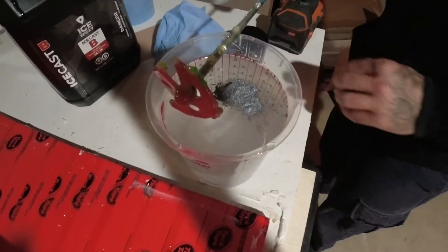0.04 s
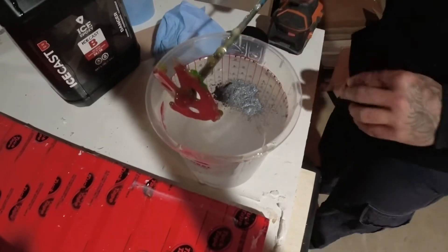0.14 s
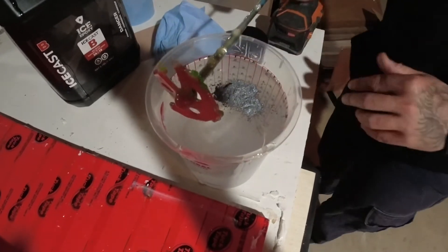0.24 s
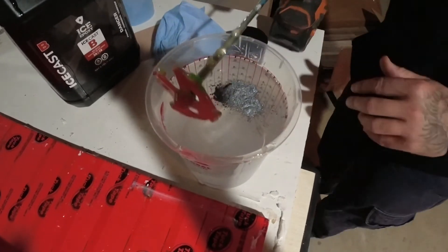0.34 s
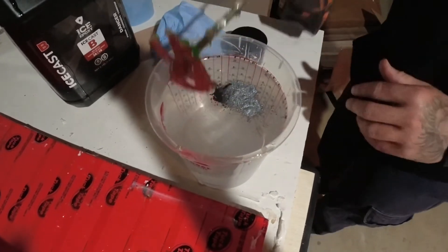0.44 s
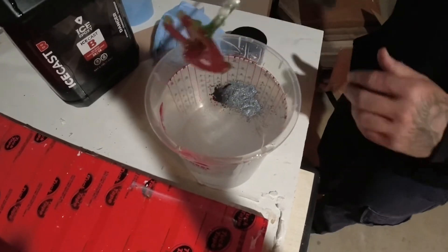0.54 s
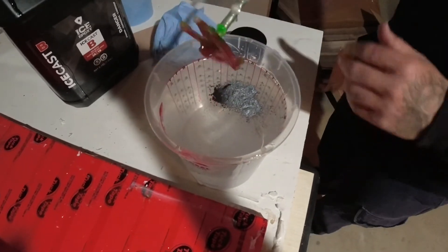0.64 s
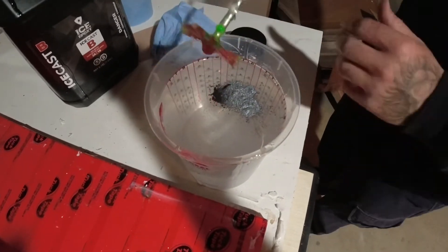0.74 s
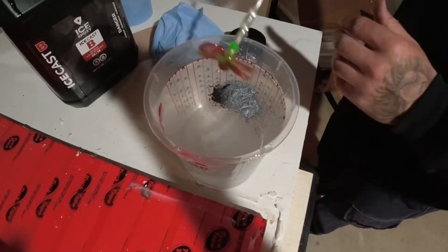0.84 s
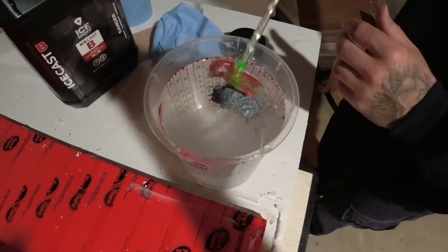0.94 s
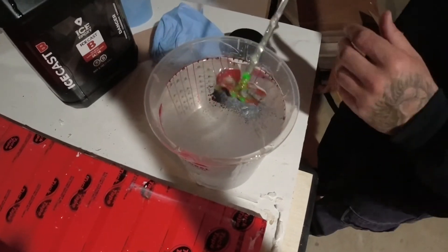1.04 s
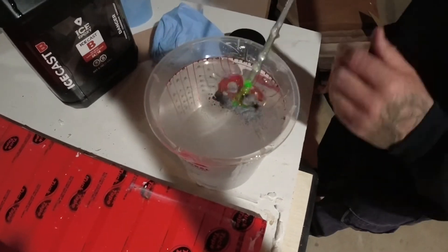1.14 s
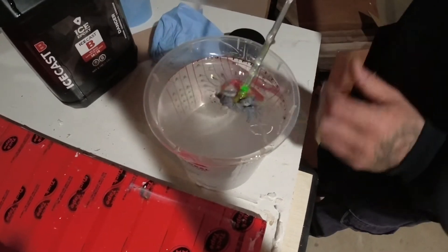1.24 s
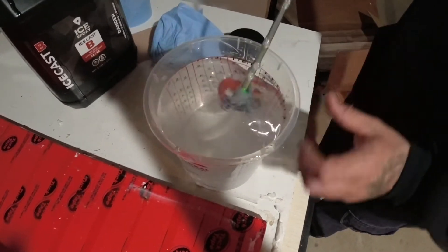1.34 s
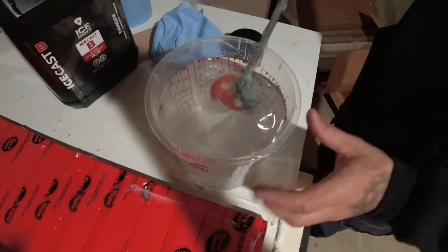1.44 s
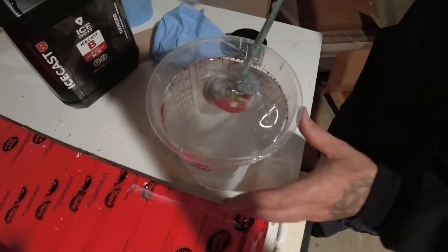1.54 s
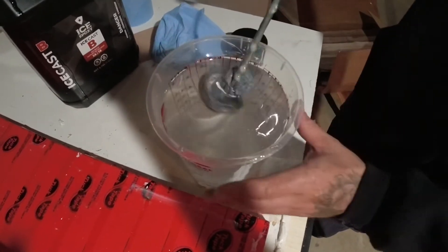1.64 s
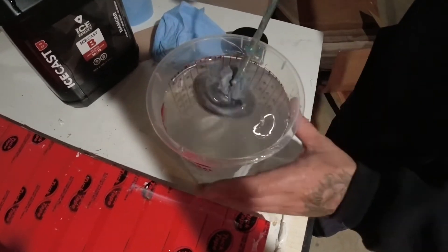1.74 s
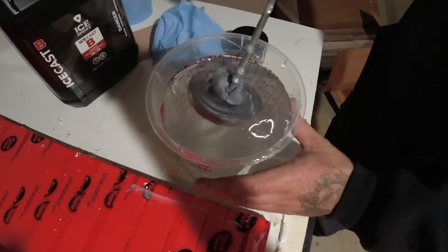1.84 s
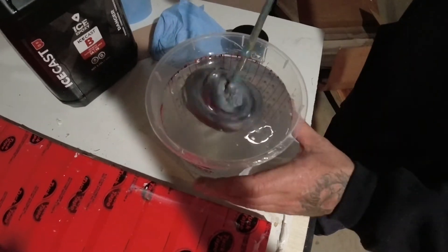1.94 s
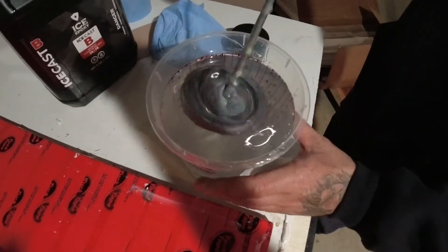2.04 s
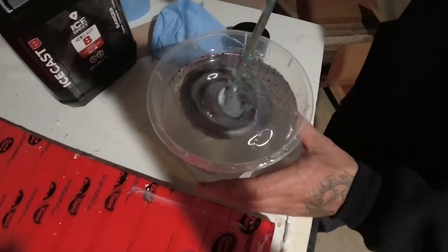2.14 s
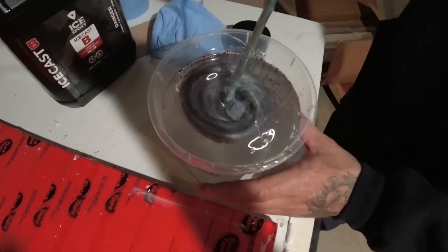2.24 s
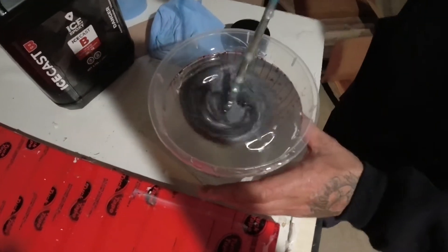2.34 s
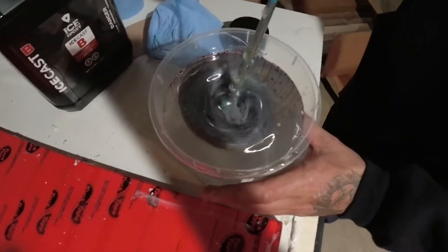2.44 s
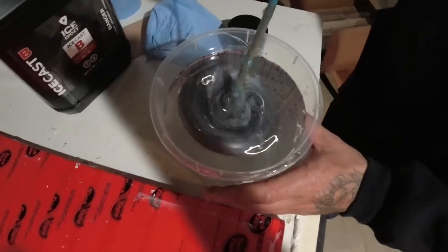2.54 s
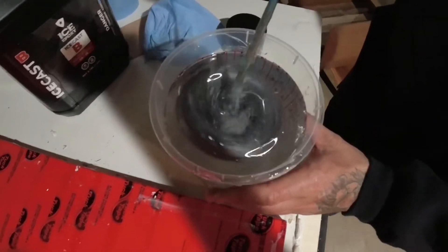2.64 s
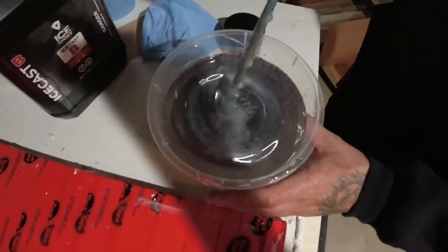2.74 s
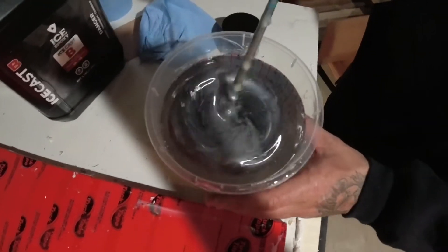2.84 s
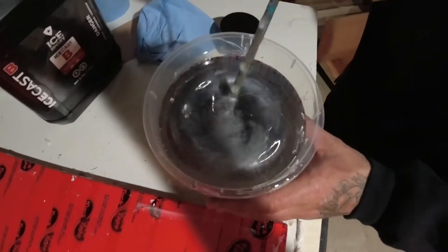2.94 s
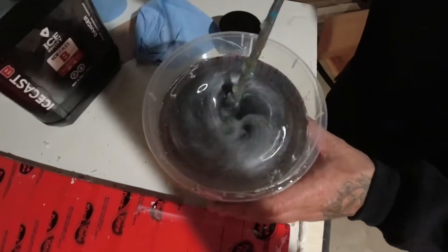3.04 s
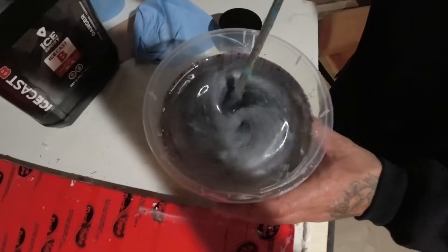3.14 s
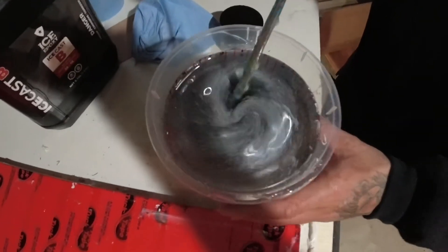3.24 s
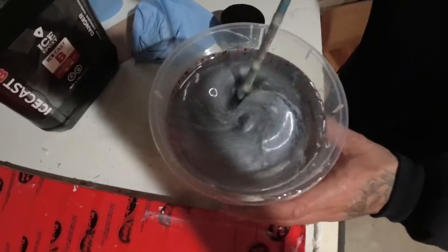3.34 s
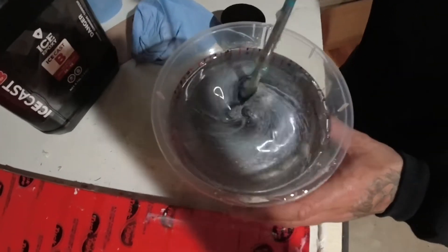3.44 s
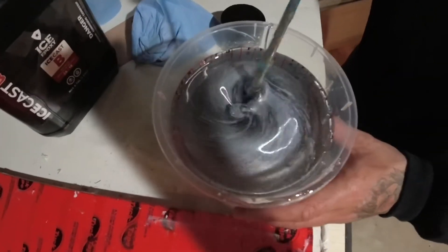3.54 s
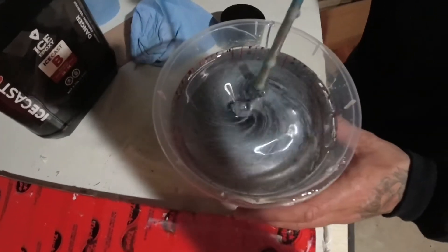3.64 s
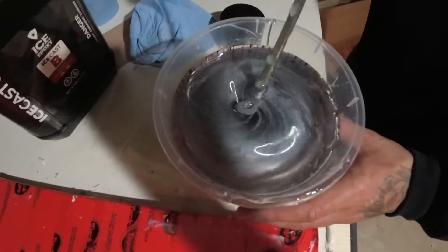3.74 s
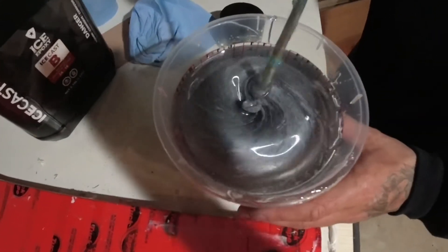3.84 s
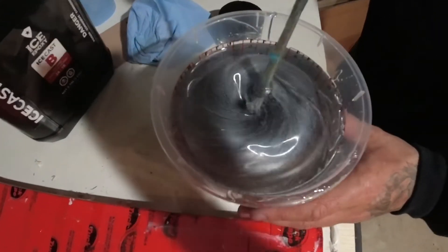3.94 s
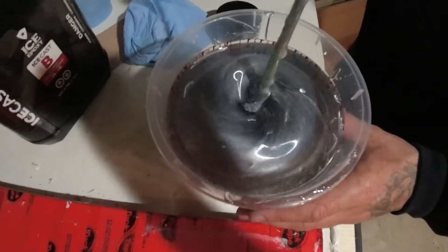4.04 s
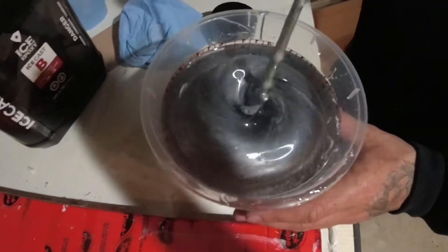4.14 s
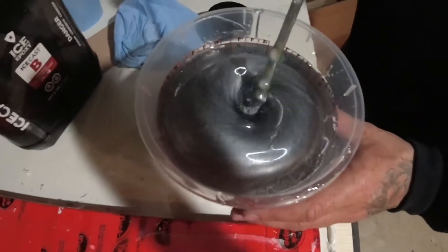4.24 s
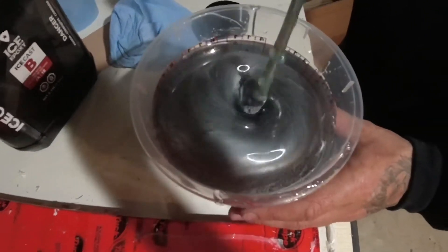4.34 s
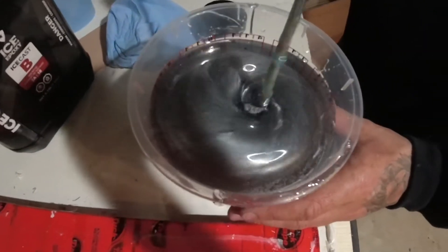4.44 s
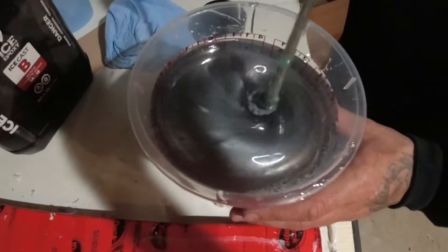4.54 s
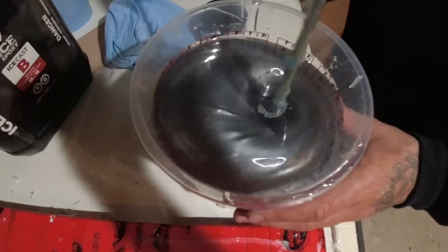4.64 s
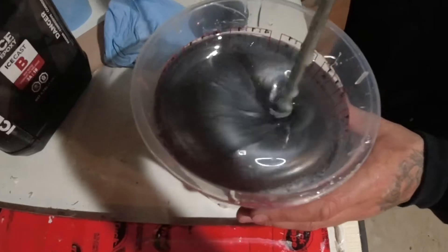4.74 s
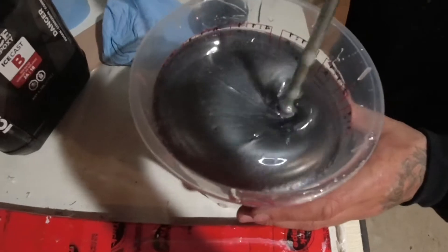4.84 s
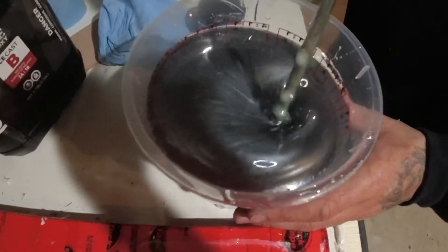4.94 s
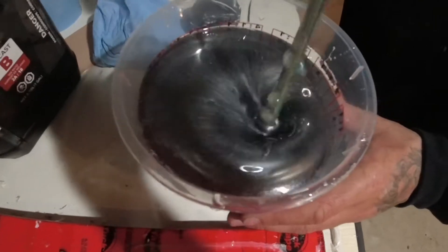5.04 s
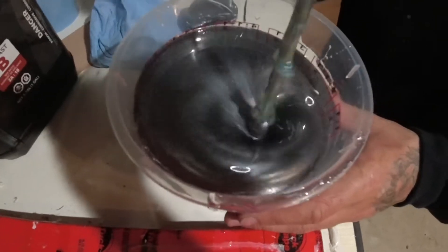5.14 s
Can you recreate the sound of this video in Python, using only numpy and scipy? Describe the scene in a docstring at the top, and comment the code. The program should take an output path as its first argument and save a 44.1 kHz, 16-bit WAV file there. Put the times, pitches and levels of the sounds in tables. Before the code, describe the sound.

After soft rustling and bench taps, a trigger snaps and a hand drill winds up into a steady, slightly wavering buzzing whine.

```python
"""A cordless drill stirs thick resin in a quiet workshop: gear mesh tones locked to the shaft, the speed control's
fixed chopping whine and its beats with the mesh, gear noise and rasp, all following a lagged motor speed.
Before and during the run, rough contacts ring cup and bench modes; trigger contacts ring switch plastic.
A short room tail answers tones and hits; rustle, mains hum and low air buffeting lie underneath."""
import sys
import numpy as np
from scipy import signal
from scipy.io import wavfile
from scipy.ndimage import uniform_filter1d

SR = 44100
rng = np.random.default_rng(int(sys.argv[2]) if len(sys.argv) > 2 else 0)


def attenuation_scalar(level_db):
    """Turn a level in dB into a linear amplitude multiplier (20 dB per decade)."""
    decades = np.asarray(level_db, float) / 20
    return 10 ** decades


def inscribe(sig):
    """Save sig as 16-bit PCM at rate SR to the path in sys.argv[1].

    A 1-D sig is mono; a 2-D sig holds one channel per row.
    Samples are clipped to [-1, 1] before scaling.
    """
    pcm = np.round(np.clip(np.atleast_2d(sig).T, -1, 1) * 32767)
    wavfile.write(sys.argv[1], SR, pcm.astype(np.int16))


N = 229275
ON_S = 1.283  # motor on
CRUISE_MESH_HZ = 1250  # speed at which cruising levels hold
PORTS = np.array([[1], [-1]])  # left, right microphone port

# left-right likeness of gear noise, also of the room tail: f/Hz, likeness/1
GEAR_LIKENESS = [(60, 0.34), (150, 0.86), (380, 0.97), (950, 1), (2380, 0.91), (5980, 0.32), (15000, 0.037)]


def evened(x):
    """Scales to rms 1."""
    return x / np.sqrt(np.mean(x ** 2) + 1e-20)


def peaked(x):
    """Scales to peak 1."""
    return x / abs(x).max()


def read(points, hz):
    """Interpolates a table over log frequency."""
    f, value = np.transpose(points)
    return np.interp(np.log(hz + 1), np.log(f + 1), value)


def curves(rows):
    """Columns at every sample, corners rounded over about 40 ms."""
    s, *columns = np.transpose(rows)
    t = np.arange(N) / SR
    return [uniform_filter1d(np.interp(t, s, c), size=1800) for c in columns]


def add(mix, s, sound):
    """Adds a sound into the mix at s seconds."""
    part = mix[round(s * SR):][:len(sound)]
    part += sound[:len(part)]


def bump(s, sigma_s):
    """Gaussian envelope, peak 1."""
    return np.exp(-.5 * ((np.arange(N) / SR - s) / sigma_s) ** 2)


def switched_on(rise_s):
    """Linear rise from 0 to 1 at motor on."""
    return np.clip((np.arange(N) / SR - ON_S) / rise_s, 0, 1)


def wander(hz):
    """One-pole random drift with corner hz, rms 1."""
    knot_rate_hz = 400
    knots = rng.standard_normal(int(N / SR * knot_rate_hz) + 2)
    smooth = signal.lfilter([1], [1, -np.exp(-2 * np.pi * hz / knot_rate_hz)], knots)
    return evened(np.interp(np.arange(N) * knot_rate_hz / SR, np.arange(len(knots)), smooth))


def noise(colour, likeness, patchy_db, size=1024, tilt_db=None):
    """Stereo noise, rms 1, from random short-time spectra with drifting patches; tilt in dB/octave."""
    hop = size // 4
    frames, hz = N // hop + 5, np.fft.rfftfreq(size, 1 / SR)
    a, b, c, d, patches = rng.standard_normal((frames, len(hz), 5)).T
    patches = uniform_filter1d(patches, size=8, axis=0)
    patches = evened(uniform_filter1d(patches, size=10, axis=1))
    same = np.clip(likeness(hz), -1, 1)[:, None]
    left = a + 1j * b
    right = same * left + np.sqrt(1 - same ** 2) * (c + 1j * d)
    field_db = colour(hz)[:, None] + patchy_db * patches
    if tilt_db is not None:
        frame_tilt_db = tilt_db[np.minimum(np.arange(frames) * hop, N - 1)]
        field_db += np.log2(hz[:, None] / 2500 + 0.047) * frame_tilt_db
    z = np.array([left, right]) * attenuation_scalar(field_db)
    return evened(signal.istft(z, nperseg=size, noverlap=size - hop)[1][:, :N])


def ring(x, hz, t60_s):
    """Two-pole resonance: one mode struck by x."""
    r = np.exp(-np.log(1000) / (t60_s * SR))
    return signal.lfilter([np.sin(2 * np.pi * hz / SR)], [1, -2 * r * np.cos(2 * np.pi * hz / SR), r * r], x)


def background():
    """Clothes rustle, mains hum and lumpy air pressure on the microphone ports."""
    # rustle spectrum: f/Hz, density/dB per Hz (relative)
    rustle_colour = [(100, -58), (200, -10.5), (400, 2.5), (800, -4.5), (1300, -6.5), (1850, -5),
                     (2500, -11), (5000, -16), (7000, -26), (10000, -29), (16000, -80)]
    # rustle left-right likeness: f/Hz, likeness/1
    rustle_likeness = [(60, 0.79), (240, 0.89), (950, 0.6), (3770, 0.17), (15000, 0.027)]
    # buffeting spectrum: f/Hz, level/dB (relative)
    buffet_colour = [(15, -2.5), (32, 9), (60, -0.5), (120, -6.5), (250, -25.5), (500, -66), (2000, -88)]
    # mains partials: f/Hz, nominal rms/dB
    hum_partials = [(60, -65), (120, -66), (240, -77.5), (360, -107)]
    # clothes rustle: t/s, lift/dB, sigma/s
    stirs = [(0.157, 8.5, 0.088), (0.816, 13, 0.36), (1.26, 12.5, 0.071)]
    # puffs of air on the ports: t/s, level/dB, sigma/s
    gusts = [(0.164, -58, 0.036), (0.355, -60, 0.033), (1, -65, 0.045), (1.55, -75, 0.079),
             (1.783, -61, 0.042), (2.145, -48.5, 0.1), (2.458, -47, 0.11), (3.064, -56, 0.046),
             (3.212, -55, 0.068), (3.35, -59, 0.052), (3.594, -56, 0.05), (3.9, -47.5, 0.081),
             (4.117, -48, 0.038), (4.44, -59, 0.074), (4.855, -61, .04), (5.01, -58, 0.021)]
    rest_db, calm_db = -86, -65  # rustle and buffeting floors

    air = noise(lambda hz: read(rustle_colour, hz), lambda hz: read(rustle_likeness, hz), 1.6)
    buffet = noise(lambda hz: read(buffet_colour, hz), lambda hz: 0.45 + 0 * hz, 2.7, size=2048)
    t, hum = np.arange(N) / SR, 0
    for hz, db in hum_partials:
        level = attenuation_scalar(db + 2.9 * wander(5.0)) * np.sqrt(2)
        hum = hum + level * np.sin(2 * np.pi * (hz * t + rng.random()) + 0.068 * PORTS)
    rustle_db = rest_db + sum(db * bump(s, sigma_s) for s, db, sigma_s in stirs)
    puffs = attenuation_scalar(calm_db) + sum(attenuation_scalar(db) * bump(s, sigma_s) for s, db, sigma_s in gusts)
    return attenuation_scalar(rustle_db) * air + puffs * buffet + hum


def knocks():
    """Tool, cup and bench touch: a rough contact rings the modes near its pitch and adds a crack."""
    # touches: t/s, peak before low-pass/dB, most strongly struck f/Hz, contact scale (3 decay times)/s,
    # crack re ringing/dB
    touches = [(0.133, -59.5, 1500, 0.0049, 7), (.303, -52, 660, 0.0074, -19), (.309, -45, 712, 0.0035, -7),
               (.315, -37, 606, 0.0025, -8), (0.332, -39, 432, 0.0048, -29), (0.347, -51, 400, 0.0084, -28),
               (0.362, -55, 300, 0.0073, -25), (0.462, -60, 4500, 0.0057, 2), (0.55, -50, 704, 0.0021, -24),
               (.601, -48.5, 1700, 0.0073, -7), (.634, -59, 1200, 0.0038, -10),
               (.959, -50, 1650, .003, -16), (.998, -59.5, 1000, 0.0052, -28),
               (1.053, -57, 300, 0.0092, -20), (1.13, -60.5, 2000, 0.0036, -19),
               (1.239, -50.5, 1190, 0.0046, -15), (2.129, -29.5, 345, 0.0012, -23)]
    # cup and bench modes: f/Hz, level before pitch weighting/dB, t60/s
    bench_modes = [(253, 0, 0.033), (327, 11, 0.037), (504, 11.5, 0.017), (710, 6, .03), (876, 8.5, 0.065),
                   (1235, 14, 0.027), (1500, 8, 0.034), (1900, 5, 0.037), (2830, -17, .025),
                   (3300, -16, 0.033), (4330, -6, .03), (4800, 0, .025)]
    reach_octaves = 1  # a mode this far from the pitch is 15 dB down

    out, t = np.zeros(N), np.arange(5000) / SR
    band = signal.butter(4, [600, 5000], "band", fs=SR, output="sos")
    grits = rng.standard_normal((len(touches), 5000))
    for (s, db, pitch_hz, contact_s, crack_db), grit in zip(touches, grits):
        contact = (1.45 + grit) * t / contact_s * np.exp(-3 * t / contact_s)
        strike, rings = np.gradient(contact), 0
        for hz, mode_db, t60_s in bench_modes:
            off_pitch_db = 15 * (np.log2(hz / pitch_hz) / reach_octaves) ** 2
            rings = rings + attenuation_scalar(mode_db - off_pitch_db) * peaked(ring(strike, hz, t60_s))
        crack = attenuation_scalar(crack_db) * peaked(signal.sosfilt(band, contact))
        add(out, s, attenuation_scalar(db) * peaked(peaked(rings) + crack))
    return signal.sosfilt(signal.butter(4, 6000, fs=SR, output="sos"), out)  # soft surfaces dull the top


def trigger():
    """The switch scrapes, snaps over and bounces; each contact rings the same plastic."""
    # contacts: t/s, peak before band-pass/dB, tilt/dB per octave, length/s
    contacts = [(1.19, -45, -25, 0.0071), (1.193, -39, 28, 0.011), (1.271, -55, 25, 0.0093),
                (1.28, -42, 9, .003), (1.2886, -15.5, -6, .002), (1.307, -43, 9, 0.003)]
    # plastic modes: f/Hz, level before tilt/dB, t60/s
    switch_modes = [(683, -33, .015), (1000, -18, 0.011), (1330, 15, 0.0068), (2100, -6, 0.0039),
                    (2650, 21, 0.0038), (3270, 6, .011), (4000, 10.5, 0.014), (7260, -30, 0.027),
                    (8200, -29, .025)]

    out, t = np.zeros(N), np.arange(3000) / SR
    grits = rng.standard_normal((len(contacts), 3000))
    for (s, db, tilt_db, length_s), grit in zip(contacts, grits):
        contact = uniform_filter1d(grit, size=5) * np.sin(np.pi * np.minimum(t / length_s, 1)) ** 2
        rings = 0
        for hz, mode_db, t60_s in switch_modes:
            rings = rings + attenuation_scalar(mode_db + tilt_db * np.log2(hz / 2000)) * peaked(ring(contact, hz, t60_s))
        add(out, s, attenuation_scalar(db) * peaked(rings))
    return signal.sosfilt(signal.butter(3, [450, 9000], "band", fs=SR, output="sos"), out)  # a small stiff part


def speed():
    """Gear mesh rate in Hz: rotor and resin lag behind every move of the finger."""
    # new finger pressures: t/s, mesh rate headed for/Hz
    squeezes = [(1.29, 1000), (2.161, 1457), (2.455, 1339), (2.969, 958), (3.509, 1354), (3.741, 1322),
                (4.035, 1337)]
    kick_hz, inertia_s, finger_s = 202, .39, .02

    t, hz, before_hz = np.arange(N) / SR, kick_hz, kick_hz
    for s, goal_hz in squeezes:
        u = np.maximum(t - s, 0)
        lag = inertia_s * np.exp(-u / inertia_s) - finger_s * np.exp(-u / finger_s)
        lag = lag / (inertia_s - finger_s)
        hz = hz + (goal_hz - before_hz) * (1 - lag)
        before_hz = goal_hz
    return hz


def housing_db(hz):
    """Lift that the casing resonances give to a vibration at hz."""
    # casing resonances: f/Hz, width (2 sigma)/Hz, lift/dB
    resonances = [(596, 450, 8), (1161, 224, 14.5), (1345, 140, 6), (1715, 400, 19.5), (2122, 210, 13),
                  (2490, 573, 18), (3380, 650, 24), (4036, 470, 22.5), (4580, 490, 15), (5585, 1360, 28.5),
                  (6980, 740, -13.5), (7690, 496, 20), (7030, 830, 2), (9205, 1430, 35.5), (9320, 88, -27),
                  (11060, 130, 29), (12730, 240, 7.5), (12220, 1560, 31), (14720, 930, 44.5)]
    return sum(db * np.exp(-.5 * ((hz - f) / (.5 * width)) ** 2) for f, width, db in resonances)


def drill():
    """Tones locked to the shaft and the chopper, and gear noise that throbs once a turn."""
    # per tone: multiple of the chopping rate/1
    chops = (0, 0, 0, 0, 0, 0, 0, 0, 0, 0, 0, 0, 0, 0, 0, 0, 0, 0, 0, 0, 1, 1, 2, 2)
    # per tone: multiple of the shaft rate/1
    turns = (1, 2, 3, 5, 10, 15, 20, 30, 40, 41, 50, 57, 60, 70, 80, 82, 90, 100, 110, 112, 10, -10, 10,
             -10)
    # per tone: level before housing lift/dB, re gear noise plus bite, or re beat level where chops is not 0
    tones_db = [-40, -38, -36, -43, -24.5, -35.5, -35.5, -43.5, -41, -59, -43, -48, -33, -47.5, -55.5, -73,
                -56.5, -77, -66, -74, -25, -36, -17.5, -29]
    # per tone: growth with speed/dB per octave, on top of any from the gear noise
    slopes_db = (3, 3, 0, 0, 2.5, -3, -3, -14, -10, 0, -2, 0, 19, 0, 6, 0, 0, 0, 0, 0, -3, 0, 5, 0)
    # per tone: rms level flutter/dB
    flutters_db = (4, 4, 3, 3, 1.5, 2.5, 2.5, 4.5, 3.5, 3, 3.5, 2, 1.5, 1.5, 2, 2, 1.5, 3, 1.5, 2, 3, 3,
                   3.5, 3)
    # gear noise spectrum before housing lift and tilt: f/Hz, density/dB per Hz (relative)
    gear_colour = [(88, -42), (150, -8), (439, -2.5), (624, 3), (905, 0), (1190, 4.5), (1420, 3),
                   (1940, 5.5), (2270, -0.5), (3920, 0.5), (6770, -6), (9080, -9), (10800, -15),
                   (15100, -21.5), (16000, -45)]
    # how the tool is held and loaded: t/s, gear noise at cruising speed/dB, bite of the teeth/dB,
    # chopping whine/dB, its beats with the mesh/dB
    hold = [(1.3, -26.5, -8, -44.5, -63), (1.42, -28, -6.5, -51, -54), (1.56, -29.5, 6.5, -46.5, -50),
            (1.85, -31.5, 4.5, -57, -48), (2.1, -31, 4, -49, -49), (2.5, -32, 8, -51, -44.5),
            (2.9, -31.5, 0.5, -41, -48), (3.2, -32, 7.5, -55, -57), (3.6, -32, 7, -45.5, -73),
            (4.3, -33, 5.5, -50.5, -53), (4.7, -33, 6, -60, -59), (5.2, -34.5, 6, -59, -53)]
    teeth, chop_hz = 10, 1936
    noise_db_per_speed_octave, tilt_db_per_octave = 10, 1.22
    jolt_db, jolt_tilt_db_per_octave, jolt_sigma_s = 5.5, -3.5, 0.062

    mesh_hz, (cruise_db, bite_db, whine_db, beat_db) = speed(), curves(hold)
    shaft = np.cumsum(mesh_hz / teeth) / SR  # turns
    chop = chop_hz * np.arange(N) / SR  # cycles
    octaves = np.log2(mesh_hz / CRUISE_MESH_HZ)
    jolt = bump(ON_S, jolt_sigma_s)  # the gears take up their slack with a dull lurch
    level_db = cruise_db + noise_db_per_speed_octave * octaves

    grid_hz = np.arange(0, SR / 2, 10.)
    lift_db, tones = housing_db(grid_hz), np.zeros((2, N))
    for c, k, db, slope_db, flutter_db in zip(chops, turns, tones_db, slopes_db, flutters_db):
        hz = abs(c * chop_hz + k * mesh_hz / teeth)
        # play between the teeth shakes level and phase; an off-centre pinion adds once-a-turn sidebands
        shake = 0.11 * flutter_db * wander(35) + 0.15 * np.sin(2 * np.pi * (shaft + rng.random()))
        lead = 5e-6 * 2 * np.pi * hz * wander(2.5)  # the hand-held tool shifts between the two ports
        base_db = beat_db if c else level_db + bite_db
        tone_db = base_db + db + slope_db * octaves + np.interp(hz, grid_hz, lift_db)
        level = attenuation_scalar(tone_db + flutter_db * wander(22))
        tones += level * np.cos(2 * np.pi * (c * chop + k * shaft) + shake + PORTS * lead)

    whine = 0
    for multiple, db in [(1, 0), (2, -14)]:
        level = attenuation_scalar(whine_db + db + 2.8 * wander(5.9)) * np.sqrt(2)
        whine = whine + level * np.cos(2 * np.pi * multiple * chop)

    gears = noise(lambda hz: read(gear_colour, hz) + .14 * housing_db(hz),
                  lambda hz: read(GEAR_LIKENESS, hz), 1.6,
                  tilt_db=tilt_db_per_octave + jolt_tilt_db_per_octave * jolt)
    throb = 1 + 0.078 * np.cos(2 * np.pi * shaft) + 0.083 * wander(41)
    gears = attenuation_scalar(level_db + jolt_db * jolt) * throb * gears
    return switched_on(0.0021) * (tones + whine), switched_on(0.0047) * gears


def rasp():
    """Lumpy noise in a drifting resonance; it grows steeply with speed."""
    # resonance: t/s, centre f/Hz, level at cruising speed/dB
    drift = [(2.2, 4260, -46), (2.6, 5000, -40), (3.4, 4200, -47.5), (3.95, 3780, -37.5),
             (4.3, 4000, -40.5), (4.6, 4000, -45.5), (5.2, 4730, -36.5)]
    db_per_speed_octave = 22

    hz, cruise_db = curves(drift)
    level_db = cruise_db + db_per_speed_octave * np.log2(speed() / CRUISE_MESH_HZ)
    a, b = rng.standard_normal((N, 2)).T
    grit = np.array([a, 0.45 * a + 0.86 * b]) * attenuation_scalar(2.4 * wander(39))
    # shift the centre to 0 Hz, low-pass with two equal poles, shift back
    carrier, r = np.exp(2j * np.pi * np.cumsum(hz) / SR), np.exp(-np.pi * 900 / SR)
    band = signal.lfilter([1], np.poly([r, r]), grit / carrier)
    return switched_on(0.035) * attenuation_scalar(level_db) * evened((carrier * band).real)


def workshop(x):
    """Room tail: sparse taps of random sign; the treble dies sooner."""
    taps = np.zeros((2, SR // 2))
    jitter = rng.integers(0, 20, (2, (SR // 2 - 121) // 20))
    at = np.arange(120, SR // 2 - 20, 20) + jitter
    np.put_along_axis(taps, at, rng.choice([-1., 1.], at.shape), 1)
    hz, t, z = signal.stft(taps, SR, nperseg=256)
    t60_s = read([(200, 0.19), (2000, 0.2), (12000, 0.029)], hz)[:, None]
    same = np.clip(read(GEAR_LIKENESS, hz), 0, 1)[:, None]
    z[1] = same * z[0] + np.sqrt(1 - same ** 2) * z[1]  # close ports hear the bass alike
    tail = signal.istft(z * attenuation_scalar(-60 * t / t60_s), SR, nperseg=256)[1]
    return signal.fftconvolve(x[None], tail / np.linalg.norm(tail[0]), axes=1)[:, :N]


def scene():
    """Sums the sources and the room's answer to tones and hits."""
    tones, gears = drill()
    hits = knocks() + trigger()
    walls = workshop(attenuation_scalar(-16) * tones.mean(0) + attenuation_scalar(-13) * hits)
    return tones + hits + walls + gears + rasp() + background()


def top_cut(x):
    """Nothing passes above the cut-off."""
    return signal.sosfilt(signal.butter(12, 16900, fs=SR, output="sos"), x)


def record(dry):
    """Band limit of the recorder: linear-phase low-pass at 15.75 kHz."""
    edge = signal.firwin(511, 15750, window=("kaiser", 9), fs=SR)
    mix = signal.oaconvolve(dry, edge[None], "same")
    return top_cut(mix)


dry = scene()
out = record(dry)
inscribe(out)
```